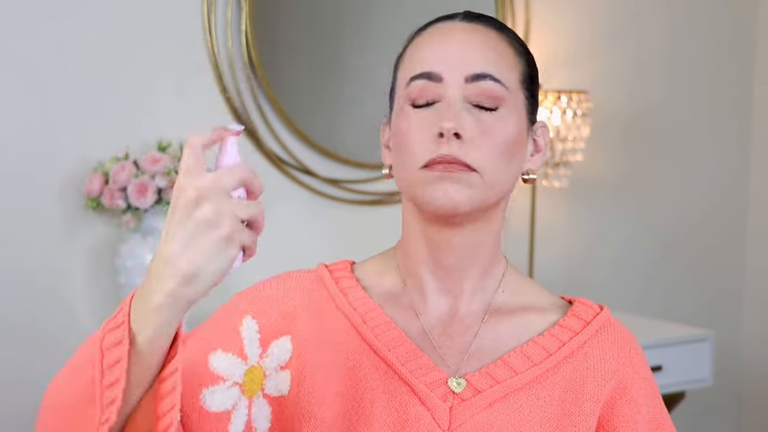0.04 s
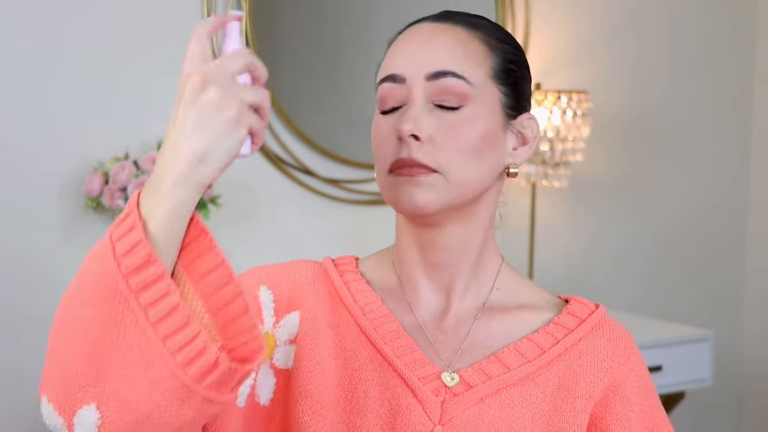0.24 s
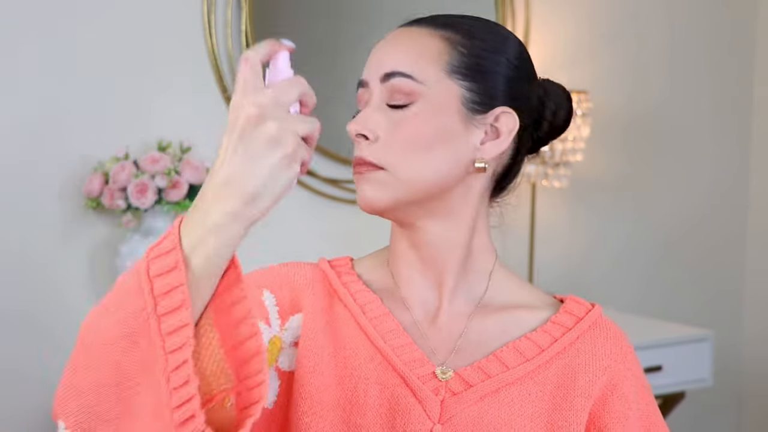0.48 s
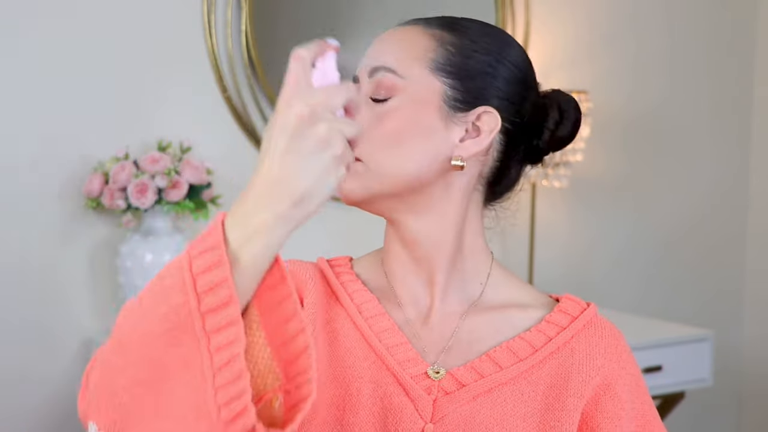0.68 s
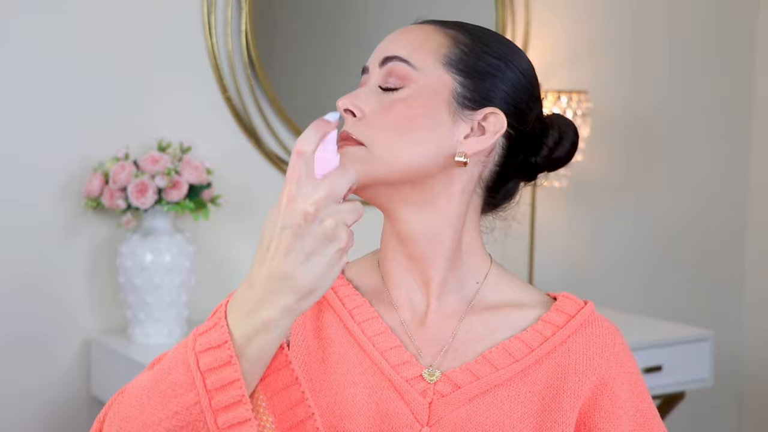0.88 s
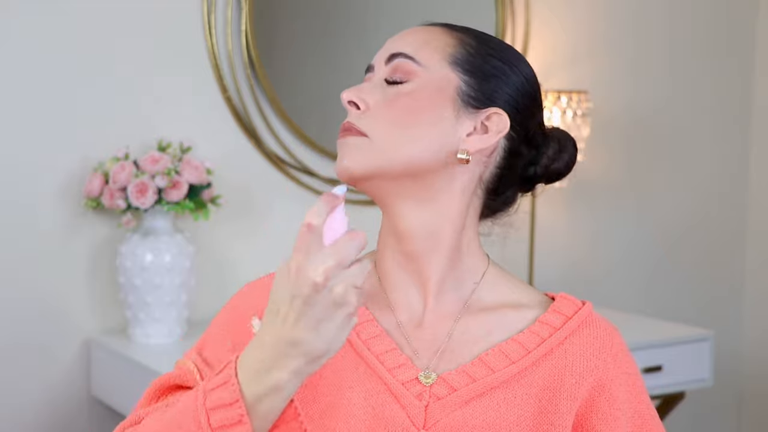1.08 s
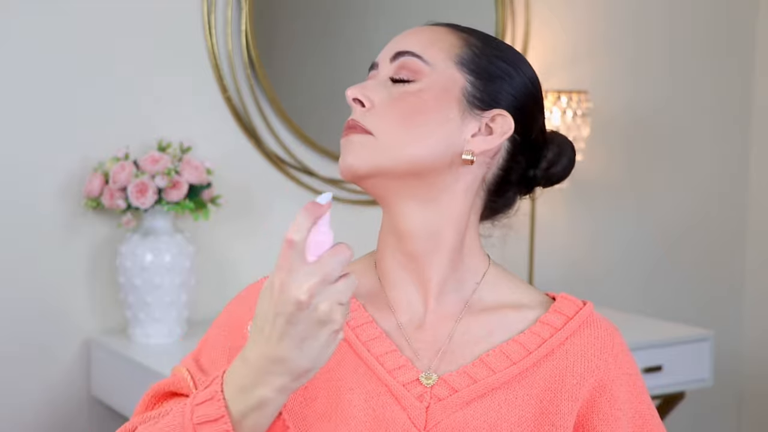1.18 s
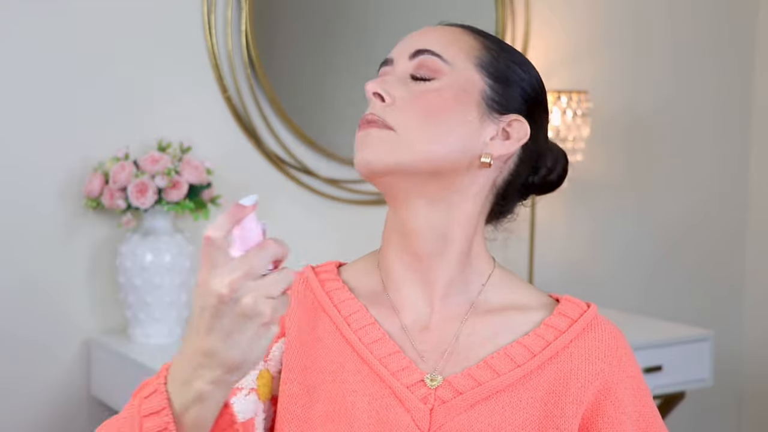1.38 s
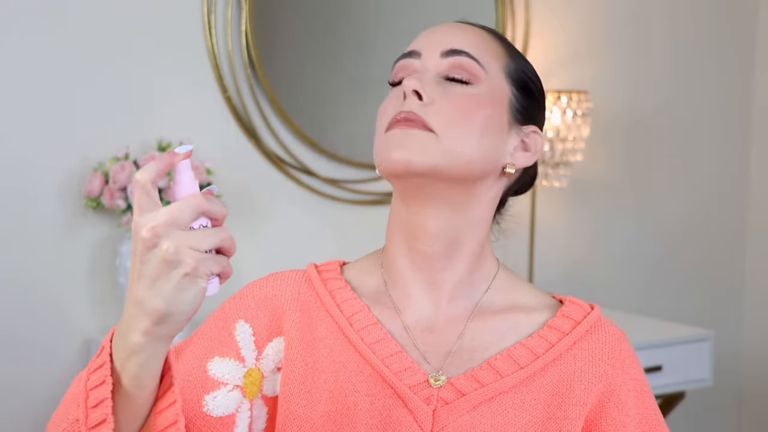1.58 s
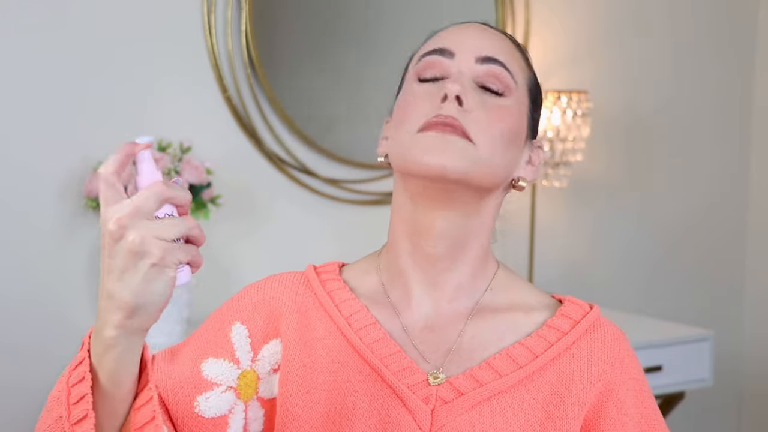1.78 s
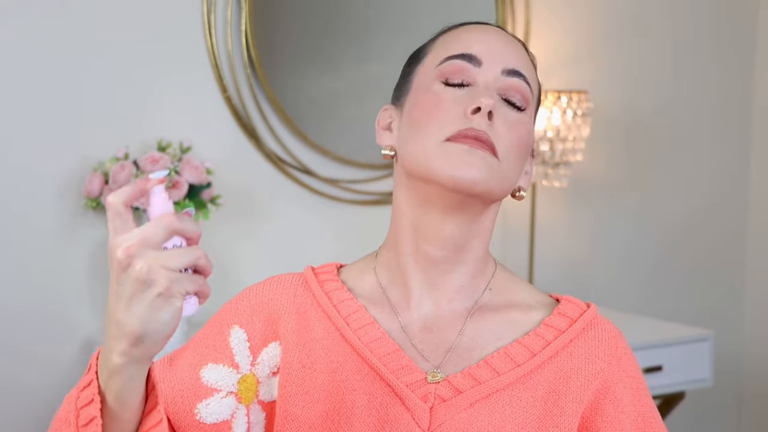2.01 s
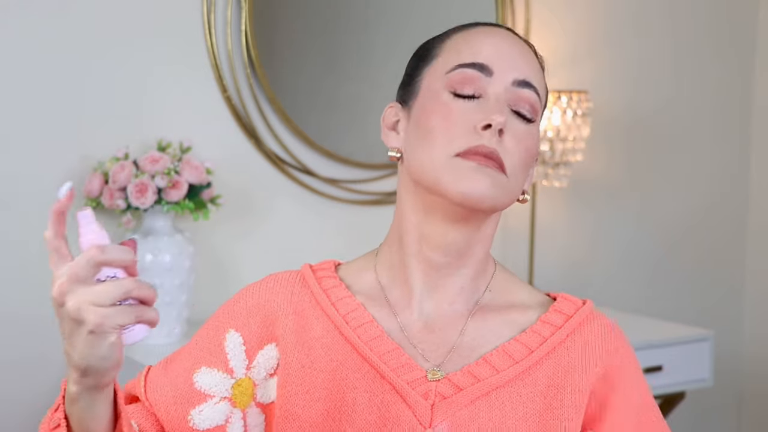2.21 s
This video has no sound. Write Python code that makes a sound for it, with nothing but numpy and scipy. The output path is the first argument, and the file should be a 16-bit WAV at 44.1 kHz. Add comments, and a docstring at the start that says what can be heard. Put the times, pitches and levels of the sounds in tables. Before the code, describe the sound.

A small pump spray bottle mists about seven times in a quick, even run. Each short hiss comes with plastic clicks and a light rattle as the head springs back, close to the microphone in a quiet room.

```python
"""A small plastic pump bottle, pressed about three times a second, close-miked in a furnished room.
On a full stroke the head tops out and rattles, a valve snaps, the plunger knocks twice, mist hisses
and the plunger bottoms. Each contact rings the bottle; the jet's start and stop push air at the mic.
The room answers briefly and holds a low rumble and a faint high whine."""
import sys
import numpy as np
from scipy import signal
from scipy.fft import rfft, irfft, next_fast_len
from scipy.io import wavfile
from scipy.ndimage import uniform_filter1d

SR = 44100
rng = np.random.default_rng(int(sys.argv[2]) if len(sys.argv) > 2 else 0)


def master_out(mix):
    """Clip the mix to full scale and print it as 16-bit PCM to the path in sys.argv[1]."""
    frames = np.transpose(np.atleast_2d(mix))
    ceiling = np.clip(frames, -1, 1)
    pcm = np.round(ceiling * 32767).astype(np.int16)
    wavfile.write(sys.argv[1], SR, pcm)


N = 99225
LEAD = SR // 10  # run-up before time zero
M = N + LEAD
TIME = (np.arange(M) - LEAD) / SR
RING_TIME = np.arange(SR // 20) / SR  # seconds since a contact
CONTACT_S = 0.000071  # how long a blow lasts
TOP_OUT, SNAP, KNOCK, KNOCK_REBOUND, BOTTOM, BOTTOM_REBOUND, RATTLE, TAP = range(8)  # kinds of contact

# the head reaching its upper stop: (time [s], level [dB])
HEAD_STOPS = [(0.5079, -32.5), (0.843, -30.5), (1.168, -32.5), (1.4791, -33.5), (2.1302, -38)]


def amp(db):
    return 10 ** (np.asarray(db) / 20)


def unit(x):
    return x / np.sqrt(np.mean(x ** 2) + 1e-20)


def along(points, hz):
    """Interpolate (frequency [Hz], value) points on a log axis."""
    f, v = np.transpose(points)
    return np.interp(np.log(hz + 1), np.log(f + 1), v)


def filtered(x, response):
    """Apply a complex frequency response."""
    m = next_fast_len(len(x) + 8192)
    return irfft(rfft(x, m) * response(np.fft.rfftfreq(m, 1 / SR)), m)[:len(x)]


def resonance(hz, width_hz, order=1):
    """A causal band-pass response."""
    return lambda f: (1j * f * width_hz / (hz * hz - f * f + 1j * f * width_hz)) ** order


def gate(start, length, rise_s, fall_s):
    """Linear rise, hold, linear fall."""
    return np.clip(np.minimum((TIME - start) / rise_s, (start + length - TIME) / fall_s), 0, 1)


def onset(rise_s):
    return 1 - np.exp(-(RING_TIME / rise_s) ** 2)


def decay(db, t60_s, t=RING_TIME):
    return amp(db - 60 * t / t60_s)


def flicker(depth_db, samples):
    """A random gain, smoothed over so many samples."""
    return amp(depth_db * unit(uniform_filter1d(rng.standard_normal(M), size=samples)))


def add(out, start, sound):
    at = round(start * SR) + LEAD
    out[at:at + len(sound)] += sound[:M - at]


def room_tone():
    """A steady low rumble under the pump."""
    # background noise: (frequency [Hz], relative density [dB])
    spectrum = [(20, -20), (45, 0), (70, 0), (130, 4.5), (300, -5.5), (1000, -13), (4000, -23.5),
                (16000, -28)]
    return amp(-68.5) * unit(filtered(rng.standard_normal(M), lambda f: amp(along(spectrum, f))))


def whine():
    """A thin tone in the room, wavering in level."""
    tone = unit(filtered(rng.standard_normal(M), resonance(8540, width_hz=25, order=2)))
    return amp(-91) * flicker(depth_db=7, samples=5000) * tone


def mist():
    """Torn liquid hisses and sputters; the flow's start and stop push air at the mic."""
    # jets: (time [s], length [s], hiss [dB], treble lift [dB], top lift [dB], air push [dB])
    jets = [(-.075, 0.071, -38.5, -4, 1.5, -51.5), (.32, 0.062, -40, -2.5, -4.5, -38.5),
            (0.391, 0.0065, -39, -1.5, 7.5, -35), (0.641, 0.058, -40, -0.5, 3.5, -33.5),
            (0.7157, 0.006, -37, 0.5, 0.5, -33.5), (0.979, 0.071, -41, -2, 3.5, -42.5),
            (1.289, 0.067, -42, 1, 6.5, -69), (1.602, 0.063, -42.5, 3, -4.5, -47.5),
            (1.918, 0.064, -42, 1.5, -18, -50), (2.017, 0.0064, -41.5, -1, -1, -48.5)]
    # the hiss: (frequency [Hz], relative density [dB])
    spectrum = [(180, -61), (300, -13), (978, -11.5), (1430, -4), (1900, -7), (2210, -5), (3830, 2.5),
                (5250, -2), (12100, -2.5), (14700, -9), (16000, -9.5)]
    # faint, brief treble ticks, many between a knock and its rebound: (time [s], level [dB])
    ticks = [(.283, -50), (0.307, -57), (0.605, -65), (.631, -55), (0.9434, -40), (.966, -64),
             (1.2556, -39.5), (1.278, -71), (1.562, -50), (1.881, -62), (1.908, -63), (2.089, -58.5),
             (2.156, -64)]
    push_lag_s, tick_s = 0.00322, 0.0024
    sputter = rng.standard_normal(M) * flicker(depth_db=1.2, samples=60)
    hiss = unit(filtered(sputter, lambda f: amp(along(spectrum, f))))
    treble = filtered(hiss, lambda f: 1 / (1 + (6000 / (f + 1)) ** 4))
    top = filtered(hiss, lambda f: 1 / (1 + (12000 / (f + 1)) ** 8))
    spray, flow = np.zeros((2, M))
    for start, length, db, treble_db, top_db, push_db in jets:
        jet = hiss + (amp(treble_db) - 1) * treble + (amp(top_db) - 1) * top
        spray += amp(db) * gate(start, length, min(.002, length / 4), .0025) * jet
        flow += amp(push_db) * gate(start + push_lag_s, length, .0018, min(.0021, length / 2))
    for start, db in ticks:
        spray += amp(db) * gate(start, tick_s, tick_s / 2, tick_s / 2) * treble
    return spray, filtered(flow, resonance(105, width_hz=260))


def plunger_rub():
    """The plunger rubs in its barrel; the grainy friction drives a body resonance."""
    # slides: (time [s], length [s], level [dB], resonance [Hz])
    slides = [(0.147, 0.039, -57.5, 2100), (0.187, 0.12, -64.5, 3020), (0.281, 0.039, -52, 2430),
              (0.53, 0.26, -74.5, 2930), (0.886, 0.11, -66.5, 3030), (1.24, 0.059, -61.5, 3120),
              (1.513, 0.099, -63.5, 2970), (1.784, 0.042, -61, 2180), (1.825, 0.12, -66, 2980),
              (2.146, 0.1, -67, 2800)]
    out = np.zeros(M)
    grains = rng.standard_normal(M) * flicker(depth_db=3.5, samples=120)
    broad = amp(-4) * unit(filtered(grains, resonance(1100, width_hz=1800, order=2)))
    for start, length, db, hz in slides:
        rub = unit(filtered(grains, resonance(hz, width_hz=980, order=2)))
        out += amp(db) * gate(start, length, rise_s=.002, fall_s=.03) * (rub + broad)
    return out


def radiated(x, corner_hz=302):
    """A small bottle radiates little bass."""
    return filtered(x, lambda f: (1j * f / (corner_hz + 1j * f)) ** 3)


def crack(db):
    """A contact's short burst of treble noise."""
    burst = decay(db, t60_s=.006) * onset(CONTACT_S) * rng.standard_normal(len(RING_TIME))
    return filtered(burst, resonance(4200, width_hz=4900))


def strike(db, kind, sign, rise_s=.00016):
    """A contact cracks and rings the bottle's modes with the weights of its striking point."""
    # the bottle's modes: (frequency [Hz], t60 [s], then a weight [dB] for each kind of contact)
    modes = [(342, 0.02, -40.5, -43, -20, -54, -36, -22, -5, -20),
             (616, 0.006, -22, 2.5, 6.5, 0, -4, -37, 4.5, 12),
             (884, 0.0081, 0, -3.5, -2, -8, -13, -7.5, -14, -2),
             (1302, 0.005, -4, 8.5, 1.5, 6, 8, -0.5, -11.5, -28),
             (1715, 0.0065, 6, -2, -21, 0.5, -13, -12, -20, -30),
             (2103, 0.013, 2, -12, 3, 3.5, -6, -32, -4, -36),
             (2610, 0.015, -11.5, -14.5, 3, -6, -7.5, 1, -8, -4),
             (3364, 0.017, -14, -1.5, -32, -14, -5, -10, -10.5, -20),
             (5200, 0.0039, -8.5, -20, -28, -28, -15, -4, -24, -35)]
    # treble crack for each kind of contact: (relative level [dB])
    crack_db = [-18, -35, -17, -6.5, -25, -38, -45, -30]
    hz, t60, *weights = np.transpose(modes)
    level_scatter, pitch_scatter = rng.standard_normal((2, len(hz)))
    detuned_hz = hz * (1 + .035 * pitch_scatter)
    rings = np.sin(2 * np.pi * np.outer(detuned_hz, RING_TIME)) * decay(0, t60[:, None])
    gains = amp(db + weights[kind] + 2.6 * level_scatter)
    body = sign * onset(rise_s) * (gains @ rings)
    softened = filtered(body, lambda f: 1 / (1 + 1j * np.pi * f * CONTACT_S) ** 3)
    return radiated(softened) + crack(db + crack_db[kind])


def soft_taps():
    """The finger and the loose head tap the bottle, hollow and dull."""
    # taps: (time [s], level [dB])
    taps = [(.1638, -45), (1.7935, -51.5), (1.799, -58), (1.8047, -44), (1.837, -41), (1.864, -55)]
    out = np.zeros(M)
    for start, db in taps:
        add(out, start, strike(db, TAP, sign=1, rise_s=.00066))
    return out


def valve_snaps():
    """The valve snaps: a crack, a thud in the body and a pitched burst that leaves a weak ring."""
    # snaps: (time [s], ring level [dB], ring pitch [Hz], thud [dB], crack [dB])
    snaps = [(0.1949, -24, 3370, -34, -40.5), (0.2562, -40.5, 3600, -67, -68),
             (0.5605, -33, 3390, -40, -44.5), (.568, -47, 3500, -69, -67.5),
             (0.8968, -38, 3400, -39.5, -50), (1.22, -24, 3050, -38, -36), (1.238, -60, 3020, -58, -67),
             (1.532, -24.5, 3050, -38.5, -34.5), (1.545, -53, 3440, -64, -68),
             (1.7905, -52, 2150, -70, -63), (1.806, -57, 2780, -67, -58), (1.815, -55, 3240, -71, -70),
             (1.838, -45.5, 3150, -52, -53), (1.8445, -50, 3620, -68, -68), (1.8687, -45, 3080, -62, -65),
             (2.1886, -40, 3360, -41.5, -54)]
    out = np.zeros(M)
    burst = np.exp(-(RING_TIME / .0017) ** 3)
    envelope = onset(.0004) * (burst + decay(-14.5, t60_s=.017))
    for start, db, hz, thud_db, crack_db in snaps:
        ring = -amp(db) * envelope * np.sin(2 * np.pi * hz * RING_TIME)
        add(out, start, crack(crack_db) + strike(thud_db, SNAP, sign=-1) + radiated(ring))
    return out


def plunger_knocks():
    """The plunger knocks and bottoms out; each blow rebounds once."""
    # knocks during the stroke: (time [s], level [dB])
    knocks = [(.2768, -33.5), (.3308, -41.5), (.6017, -32), (.6525, -38.5), (.935, -34.5), (.9903, -41.5),
              (1.2466, -36.5), (1.3004, -40.5), (1.5577, -37), (1.6135, -43.5), (1.8757, -36),
              (1.9305, -44.5)]
    # blows on the lower stop: (time [s], level [dB])
    bottoms = [(.3937, -32), (.7183, -31.5), (1.0416, -32.5), (1.3478, -32.5), (2.0197, -38.5)]
    out = np.zeros(M)
    for blows, kind, rebound, rebound_s in ((knocks, KNOCK, KNOCK_REBOUND, .0092),
                                            (bottoms, BOTTOM, BOTTOM_REBOUND, .0069)):
        for start, db in blows:
            add(out, start, strike(db, kind, sign=-1))
            add(out, start + rebound_s, strike(db, rebound, sign=-1))
    return out


def head_rattle(gap_s=.0055):
    """The head tops out and rattles three times while air fizzes back in."""
    out = np.zeros(M)
    for start, db in HEAD_STOPS:
        add(out, start, strike(db, TOP_OUT, sign=1))
        fizz = gate(start, .023, rise_s=.00096, fall_s=.0054) * rng.standard_normal(M)
        out += amp(db - 28.5) * fizz
        for step, (shift, size) in enumerate(rng.random((3, 2))):
            delay = (step + 1 + .585 * shift) * gap_s
            bounce_db = db - 7.5 + 4 * size - 2 * step
            add(out, start + delay, strike(bounce_db, RATTLE, np.sign(size - .5), rise_s=.00033))
    return out


def top_out_thumps(hz=136, lag_s=.00536):
    """A soft low thump as the head tops out and rattles."""
    out, t = np.zeros(M), np.arange(SR // 10) / SR
    for start, db in HEAD_STOPS:
        add(out, start + lag_s, decay(db - 17, t60_s=.037, t=t) * np.sin(2 * np.pi * hz * t))
    return out


def room_answer(x, delay_s=.004):
    """The furnished room's short tail; each frequency dies at its own speed."""
    # reverberation: (frequency [Hz], t60 [s])
    decay_times = [(200, 0.47), (1000, 0.25), (4000, 0.42), (8000, 0.24), (15000, 0.21)]
    hz, t, noise = signal.stft(rng.standard_normal(SR // 2), SR, nperseg=256)
    tail = signal.istft(noise * decay(0, along(decay_times, hz)[:, None], t), SR, nperseg=256)[1]
    delayed = np.pad(x, (round(delay_s * SR), 0))
    return signal.fftconvolve(delayed, tail / np.linalg.norm(tail))[:M]


def scene():
    """The bottle up close with the room well behind it; air push and low thumps stay dry."""
    spray, air_push = mist()
    bottle = spray + plunger_rub() + soft_taps() + valve_snaps() + plunger_knocks() + head_rattle()
    room = amp(-12.5) * room_answer(bottle) + room_tone() + whine()
    return (bottle + air_push + top_out_thumps() + room)[None, LEAD:]


def record(dry):
    """One microphone that drops the deep bass; nothing passes above the band limit."""
    low_hz, top_hz, edge_hz = 39.7, 15950, 250

    def microphone(f):
        low_cut = (1j * f / (low_hz + 1j * f)) ** 4
        return low_cut * np.clip((top_hz - f) / edge_hz, 0, 1)

    return filtered(dry[0], microphone)[None]


dry = scene()
out = record(dry)
master_out(out)
```